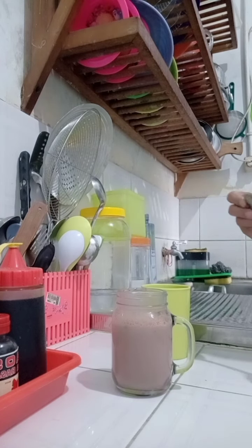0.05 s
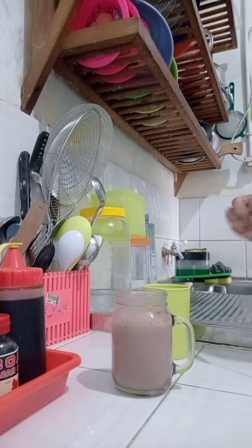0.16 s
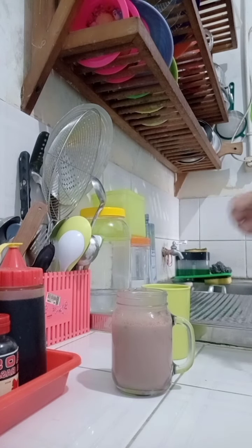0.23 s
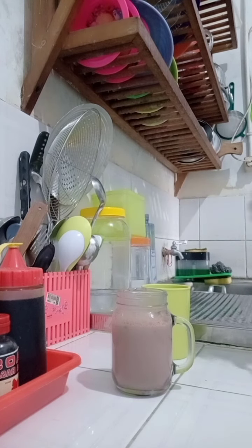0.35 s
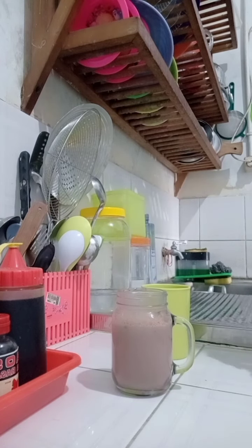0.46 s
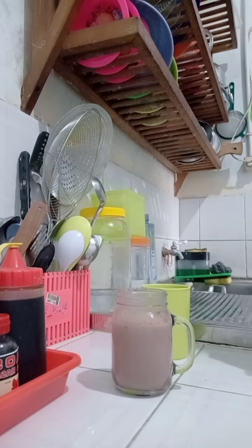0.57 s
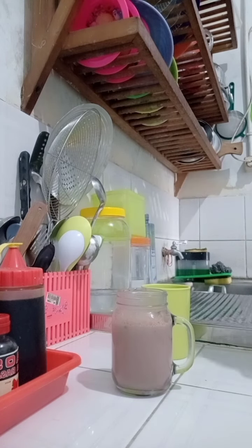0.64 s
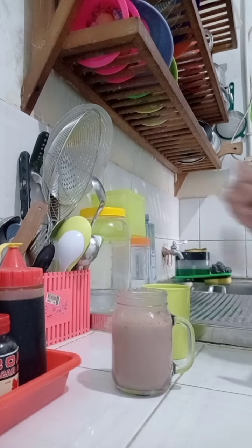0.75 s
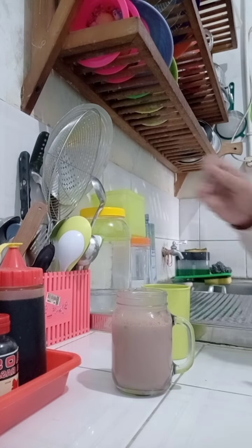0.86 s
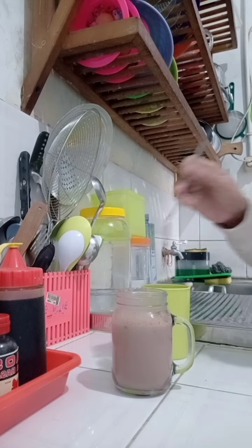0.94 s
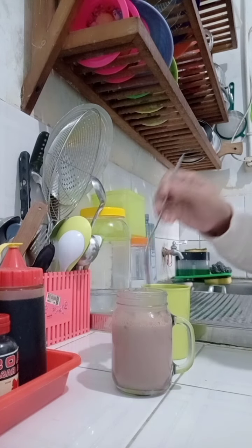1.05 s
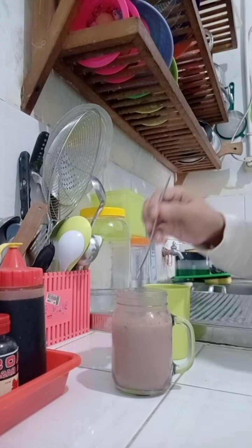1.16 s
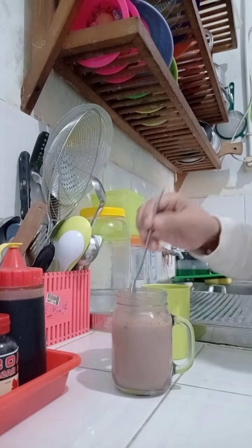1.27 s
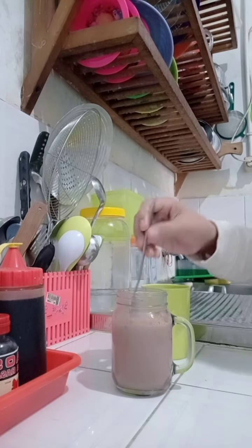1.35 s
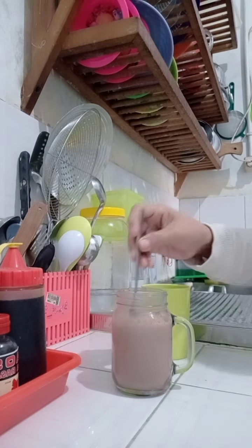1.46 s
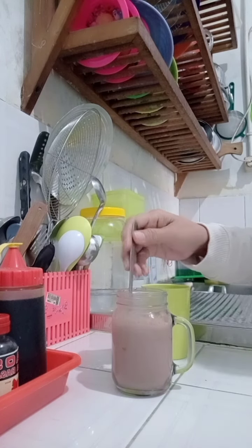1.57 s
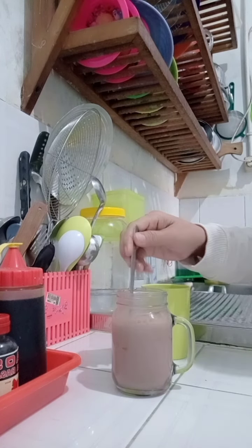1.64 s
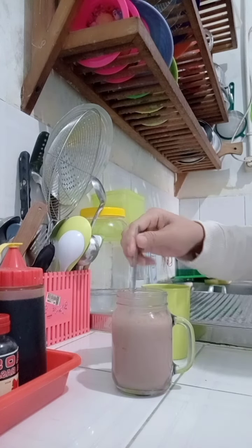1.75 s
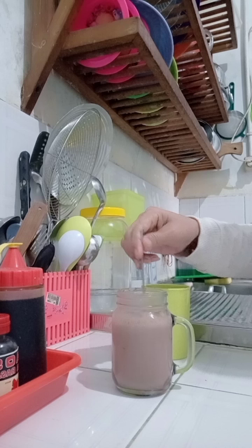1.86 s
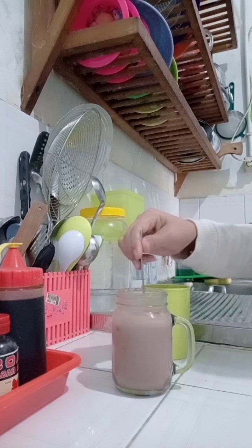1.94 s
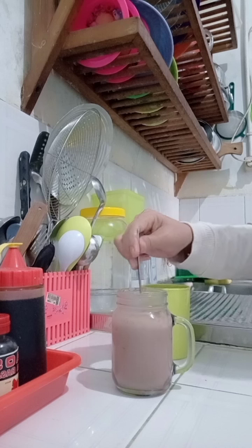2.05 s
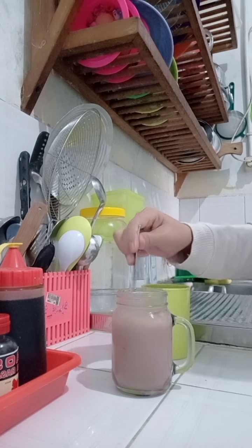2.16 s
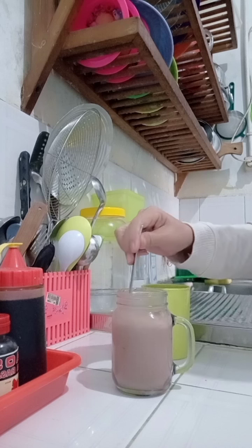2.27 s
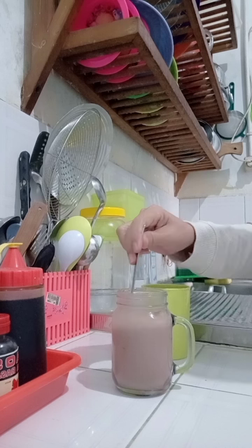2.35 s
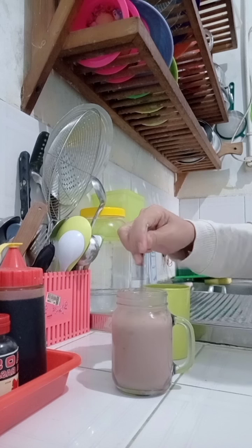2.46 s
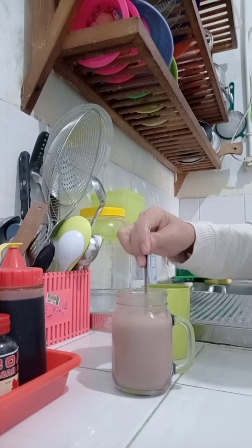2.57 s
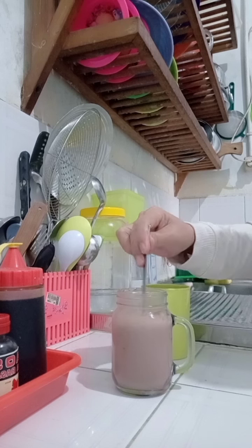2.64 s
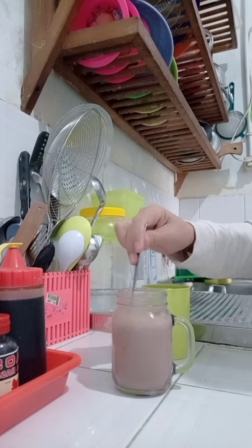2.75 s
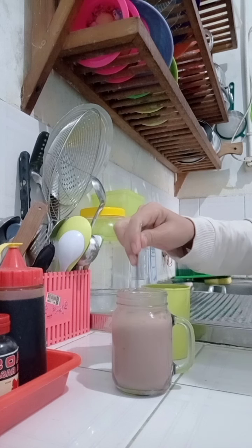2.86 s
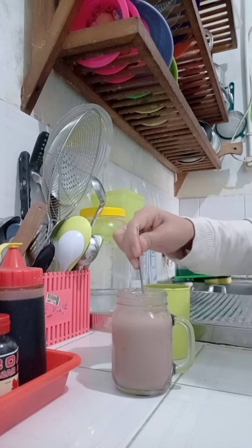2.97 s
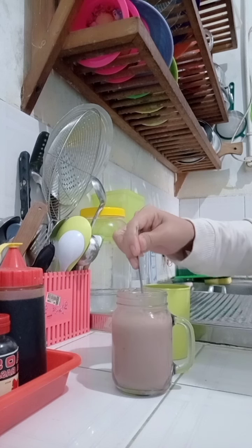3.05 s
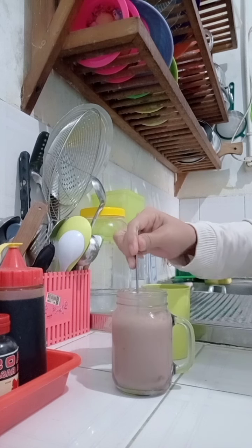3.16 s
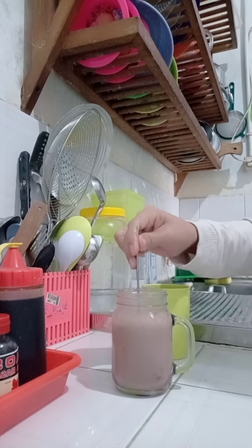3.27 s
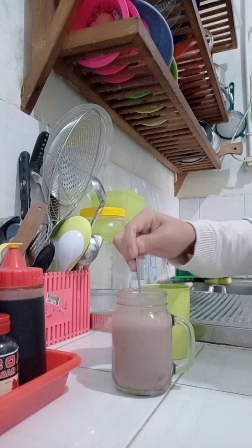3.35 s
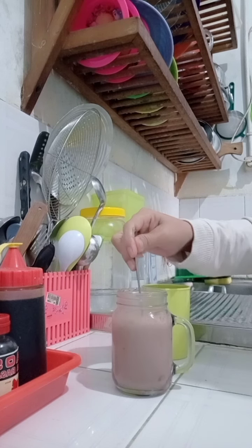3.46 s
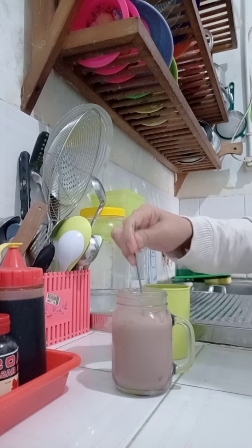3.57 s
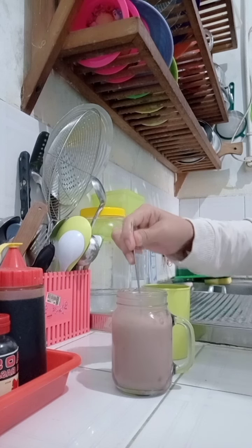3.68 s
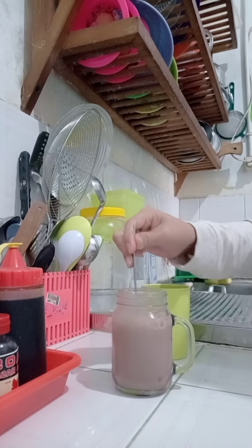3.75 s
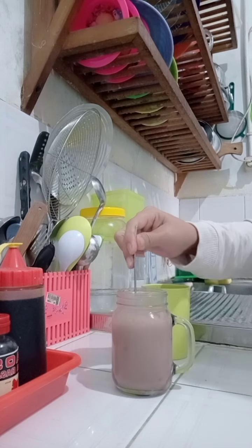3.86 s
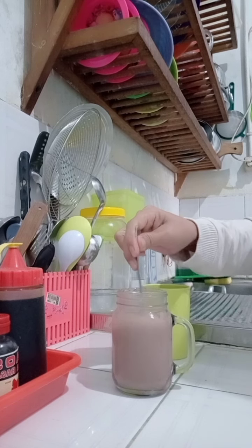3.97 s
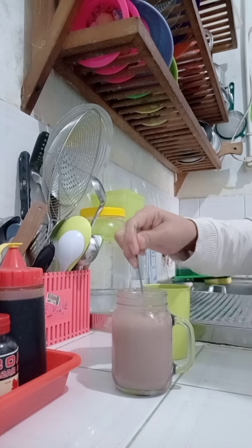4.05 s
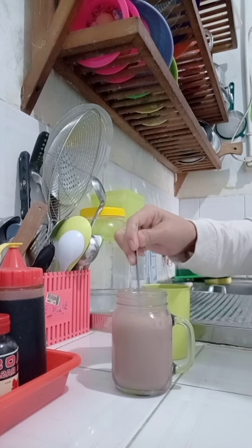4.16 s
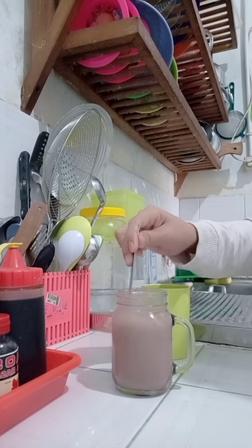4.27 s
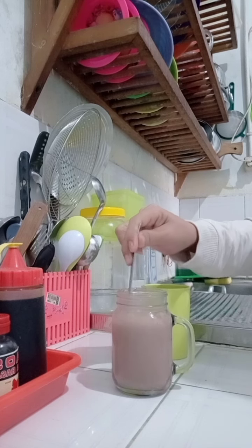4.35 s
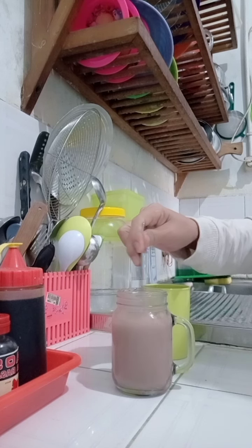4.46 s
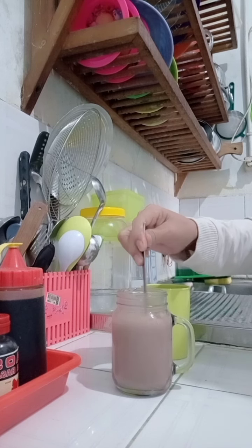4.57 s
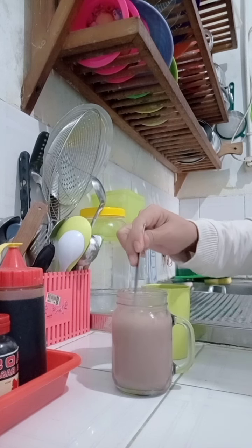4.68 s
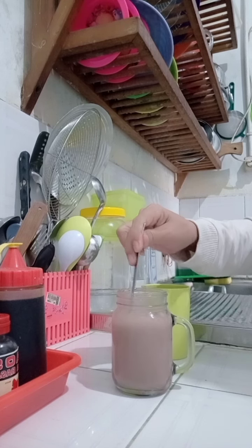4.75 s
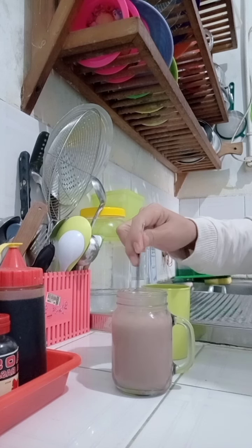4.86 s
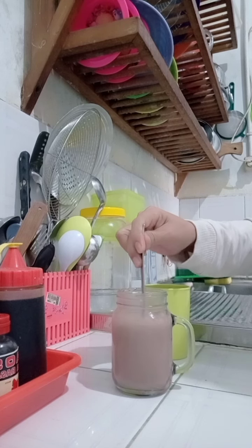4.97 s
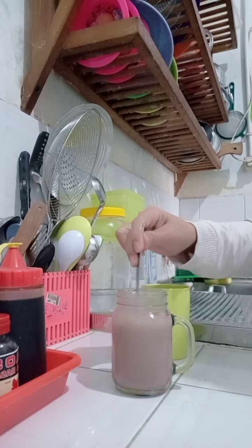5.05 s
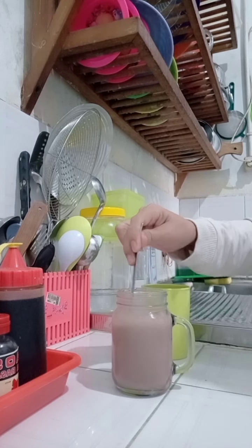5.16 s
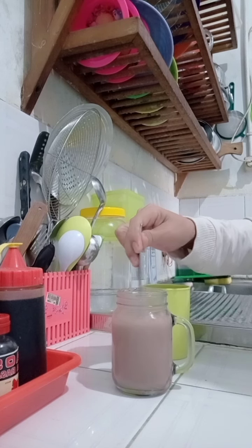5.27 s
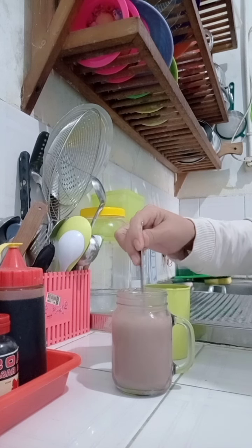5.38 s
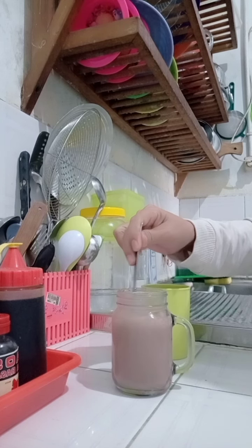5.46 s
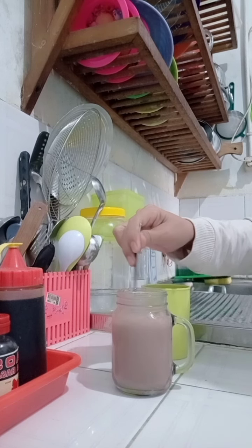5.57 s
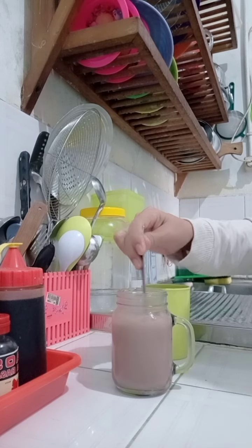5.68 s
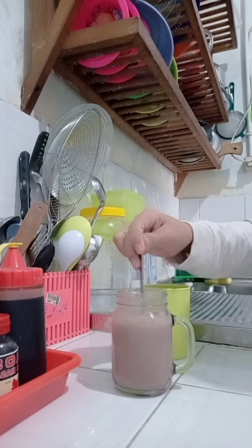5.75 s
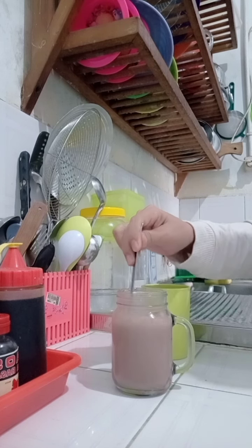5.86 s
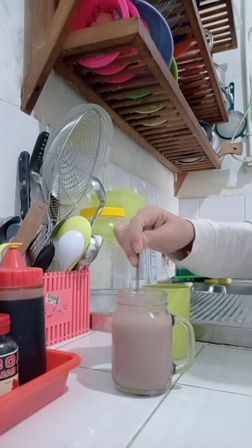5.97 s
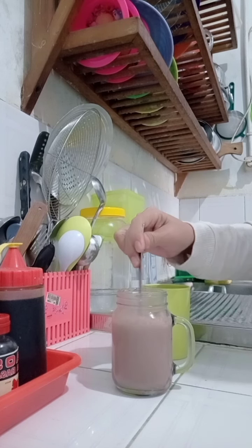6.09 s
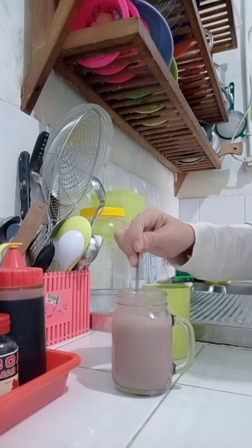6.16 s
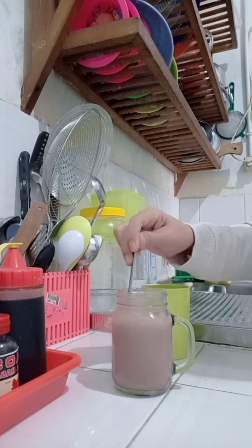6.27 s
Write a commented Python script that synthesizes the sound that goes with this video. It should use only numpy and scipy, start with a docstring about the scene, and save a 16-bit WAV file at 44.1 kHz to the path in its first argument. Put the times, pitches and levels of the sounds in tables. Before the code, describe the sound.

A metal spoon knocks irregularly against a full glass mug, dull choked clinks over quiet room hush in a small hard tiled kitchen.

```python
"""Stirring a frothy drink.

A metal spoon stirs a thick frothy drink in a glass mug on a tiled counter, near a phone with two inlets.
The froth damps the glass: each blow is a bundle of short swelling modes with a tick and a counter thump.
The first two taps let the spoon ring free; later ones carry a treble crack made of shaped noise instead.
Single echoes and noise-like tails make the hard kitchen; filtered hush and gliding whistles lie beneath.
"""
import sys
import numpy as np
from scipy import signal
from scipy.fft import rfft, irfft
from scipy.io import wavfile
from scipy.ndimage import uniform_filter1d

SR = 44100
rng = np.random.default_rng(int(sys.argv[2]) if len(sys.argv) > 2 else 0)


def unload_audio(sound):
    """Save the sound as a 16-bit wav file, at the path given as the first command line argument."""
    columns = np.transpose(np.atleast_2d(sound))
    # keep every value between -1 and 1, then stretch to whole-number steps
    steps = np.round(np.clip(columns, -1, 1) * 32767)
    wavfile.write(sys.argv[1], SR, steps.astype(np.int16))


N = 278712

# All levels are relative to the other parts of the same layer, before the room.
# spoon blows on the glass: start_s, strength_db, wall_hz, belly_over_wall_db, belly_hz, tick_over_wall_db
BLOWS = [(0.428, -70.5, 1390, 14.5, 842, -18), (1.2269, -35, 1720, 7.5, 1040, 9),
         (1.6307, -57, 1500, -13, 1130, -10), (1.6502, -56, 1820, -22, 955, -20),
         (1.7718, -30, 1360, 1, 780, -9.5), (1.978, -33, 1430, -6.5, 820, -2),
         (1.9912, -43, 1350, -3, 850, 2), (2.3699, -23.5, 1503, -5.5, 1010, -20),
         (2.391, -45, 1520, -27, 900, -1), (2.6068, -48, 1600, -10, 670, -24),
         (2.762, -25, 1237, -8.5, 1037, -10.5), (2.9512, -30, 1440, 1.5, 1227, -14),
         (3.0315, -45.5, 1450, -12, 1110, -22), (3.053, -51.5, 1650, -1, 740, -13),
         (3.061, -56, 1620, -1, 895, -8), (3.143, -53, 1380, -19, 1130, -29),
         (3.185, -73, 1500, -4, 900, -2), (3.2274, -23.5, 1425, -8, 940, -0.5),
         (3.4575, -41, 1645, -5, 1156, -32), (3.514, -54, 1840, 1, 1210, -32),
         (3.5367, -55, 1565, 2.5, 810, -30), (3.6089, -52, 1230, 5, 1150, -15),
         (3.6447, -33.5, 1330, -9, 980, 2.5), (3.6698, -59, 1140, 4, 1160, -15),
         (3.8694, -26.5, 1437, -13, 970, -4), (3.9972, -41, 1160, 4, 803, -47),
         (4.0829, -53.5, 1210, 3, 760, -25), (4.1158, -41.5, 1270, 6.5, 740, -34),
         (4.13, -40, 1310, 3, 780, -14), (4.144, -44.5, 1490, -1, 750, -14),
         (4.3762, -26.5, 1340, -9, 1240, -21), (4.39, -49, 1530, 8, 890, 2),
         (4.466, -28, 1404, -2, 1120, -12.5), (4.552, -47, 1660, -10, 840, -16),
         (4.6467, -22, 1410, -10, 787, -15.5), (4.717, -19.5, 1390, -9.5, 842, 1.5),
         (4.78, -27, 1360, -6.5, 980, -38), (4.932, -27, 1345, -8, 750, -21),
         (4.9544, -41.5, 1680, -2, 955, -12), (4.9722, -44, 1190, -17, 1100, -0.5),
         (5.1538, -29.5, 1370, -15.5, 732, -29), (5.2993, -27, 1370, -4, 732, -13.5),
         (5.3217, -32, 1145, -7, 1060, -11.5), (5.6199, -28.5, 1350, -13, 1090, -25),
         (5.6622, -32.5, 1396, 0, 798, -13), (5.683, -45.5, 1400, 11.5, 1110, -3.5),
         (5.8155, -32, 1400, -2, 800, -13), (5.8249, -35, 1770, -10, 860, -4),
         (5.8641, -34, 1326, -8, 770, -19), (5.9362, -34.5, 1253, -26, 1090, -16),
         (6.047, -26, 1327, -3.5, 761, -18.5), (6.2781, -36, 1340, -13.5, 1110, -26)]
# plips of the drink around the spoon: start_s, pitch_hz, level_db
PLIPS = [(.505, 865, -65), (2.334, 1340, -54), (2.341, 1520, -51), (2.355, 1510, -54), (2.631, 730, -60),
         (2.685, 1550, -57), (3.09, 258, -50)]
# modes of the spoon ringing free: pitch_hz, level_over_tick_db, t60_s
SPOON_MODES = [(2890, -42, .2), (3914, -17, .3), (8215, -35, .1), (11270, -37, .25), (13200, -52, .15),
               (14030, -52, .15), (15050, -44, .12)]
# resonances of the microphone inlet, excited by the tick: pitch_hz, level_db
INLET_MODES = [(4846, -0.5), (5267, -9.5), (4016, -5.5), (3300, -17), (6940, -26)]
# colour of the treble crack: freq_hz, level_db
CRACK_COLOUR = [(5000, -15.5), (6800, -22.5), (7600, -29.5), (8600, -22), (10000, -37), (11300, -24),
                (12200, -37), (13600, -16.5), (15000, -40), (16400, -43.5)]
# how readily the counter booms over the course of the stir: time_s, level_db
THUMP_LEVEL = [(1.2, -48), (3.5, -55.5), (4.2, -45.5), (6.3, -42)]
# near reflections off tiles and wall, as set for the left inlet: delay_s, share
COUNTER_ECHOES = [(.0011, 0.042), (.0021, 0.28), (.0055, .15)]
# right inlet compared with the left: freq_hz, level_db
RIGHT_SHADE = [(250, -10.5), (700, -3), (1300, -11), (2400, -14.5), (4400, -10.5), (8000, -8.5),
               (15000, -12)]
# decay of the kitchen tail: freq_hz, t60_s
KITCHEN_DECAY = [(250, 0.52), (600, 0.56), (1400, 0.53), (3700, 0.55), (9700, 0.41)]
# colour of the kitchen tail: freq_hz, level_db
KITCHEN_COLOUR = [(100, -40), (250, 0.5), (500, 4.5), (900, -0.5), (1300, -4.5), (1650, 8), (2100, 1),
                  (3000, 9.5), (3800, -3.5), (4800, -2), (6500, 3), (9000, -3.5), (13000, -2)]
# left-right likeness of the kitchen tail: freq_hz, likeness
KITCHEN_LIKENESS = [(200, 1), (600, 0.96), (1200, 0.022), (4000, 0.06)]
# tones that linger in the nook under the shelf: pitch_hz, level_db
NOOK_TONES = [(767, -8), (1204, -6), (1441, 0), (1545, -3), (1578, -2), (1600, 0), (1638, -1), (1696, -5),
              (1777, -4), (1831, -6), (1960, -6), (2040, -7), (2348, -9)]
# colour of the room hush: freq_hz, level_db
HUSH_COLOUR = [(20, -16), (35, -48), (70, -7.5), (105, -8), (165, -3.5), (260, -7), (500, -9), (900, -10),
               (1400, -15), (2300, -10.5), (3300, -20), (5000, -22.5), (8000, -33.5), (13500, -32.5),
               (16400, -38)]
# left-right likeness of the hush: freq_hz, likeness
HUSH_LIKENESS = [(60, 0.65), (240, 0.82), (950, 0.034), (3770, 0.035), (15000, -0.09)]
# level of the low swirl of the drink: time_s, level_db
SWIRL_LEVEL = [(0, -105), (1.5, -81.5), (3, -68.5), (4, -75), (4.998, -69), (5.6, -69), (6.252, -69.5),
               (6.32, -55)]
# colour of the swirl: freq_hz, level_db
SWIRL_COLOUR = [(60, -39.5), (100, 12), (250, -4.5), (400, 9.5), (900, -83.0)]
# faint far whistles: start_s, length_s, first_hz, last_hz, level_db
WHISTLES = [(.63, .12, 2800, 2800, -68), (5.7, .13, 2850, 3000, -60), (5.86, .2, 3600, 3400, -62),
            (6.09, .2, 3750, 3900, -64), (6.21, .16, 2950, 2850, -58)]

HUSH_DB = -63.5
DIPPED_S = 1.4  # from here on the drink grips the spoon
CROSSFADES_PER_S = 1.3  # pace at which the kitchen tails crossfade, in half turns
NEAR_DB = 9.5  # lift of the direct sound and its near echoes against the kitchen tail
RIGHT_LAG = 8  # samples further to the right inlet
NOOK_DB, NOOK_T60 = -15, .4  # level in dB against the tail, decay in s
SHOULDER_RATIO, SHOULDER_DB = 1.445, -3  # pitch ratio and dB to the wall
BASE_HZ, BASE_DB = 606, -19.5  # heavy foot of the mug on the tile, dB to the belly before the push
PUSH_FULL_DB = -11.5  # blows with a softer tick than this push no further
CRACK_DB, CRACK_SHARE = -9, .45  # dB to the wall, and dB gained per dB of hardness
THUMP_HZ, THUMP_T60, THUMP_SHARE = 252, 0.092, 0.56  # pitch, decay in s, dB per dB of belly
EDGE_HZ = 16400  # upper band limit
OFFSET = .0011  # constant bias of the converter, share of full scale


def amp(db):
    """Turn decibels into an amplitude factor."""
    return 10 ** (np.asarray(db) / 20)


def evened(x):
    """Scale to an RMS of one."""
    return x / np.sqrt(np.mean(x ** 2) + 1e-20)


def peaked(x):
    """Scale to a peak of one."""
    return x / abs(x).max()


def read(points, hz):
    """Read a curve between its points on a logarithmic frequency axis."""
    f, value = np.transpose(points)
    return np.interp(np.log(hz + 1), np.log(f + 1), value)


def add(mix, s, sound):
    """Lay a sound into the mix at s seconds, cut off at the end."""
    part = mix[..., round(s * SR):][..., :sound.shape[-1]]
    part += sound[..., :part.shape[-1]]


def coloured(spectrum, count):
    """Noise shaped by a spectrum, at an RMS of one."""
    gain = amp(read(spectrum, np.fft.rfftfreq(count, 1 / SR)))
    return evened(irfft(rfft(rng.standard_normal(count)) * gain, count))


def ring(t, hz, t60, rise, phase):
    """A mode that swells for a moment, then dies exponentially."""
    envelope = peaked((1 - np.exp(-t / rise)) ** 2 * amp(-60 * t / t60))
    return envelope * np.sin(2 * np.pi * (hz * t + phase))


def press(t, hz, peak, spread, phase):
    """A mode that swells while the spoon presses and is choked by the froth."""
    envelope = peaked(t / (t + 0.00037) * np.exp(-((t - peak) / spread) ** 2))
    return envelope * np.sin(2 * np.pi * (hz * t + phase))


def hush():
    """Room noise whose level wanders softly, alike left and right in the bass, with a low swirl on top."""
    frames, hz = N // 256 + 5, np.fft.rfftfreq(1024, 1 / SR)
    a, b, c, d, patches = rng.standard_normal((frames, 513, 5)).T
    patches = evened(uniform_filter1d(uniform_filter1d(patches, 12, 0), 14, 1))
    same = np.clip(read(HUSH_LIKENESS, hz), -1, 1)[:, None]
    left, other = a + 1j * b, c + 1j * d
    z = np.array([left, same * left + np.sqrt(1 - same ** 2) * other])
    z *= amp(read(HUSH_COLOUR, hz)[:, None] + 1.6 * patches)
    noise = signal.istft(z, nperseg=1024, noverlap=768)[1][:, :N]
    noise *= amp(HUSH_DB) / noise.mean(0).std()
    swirl_db = np.interp(np.arange(N) / SR, *np.transpose(SWIRL_LEVEL))
    swirl = amp(swirl_db) * coloured(SWIRL_COLOUR, count=N)
    return (noise + swirl) * amp([[1.1], [-1.1]])  # leans left


def whistles():
    """Gliding tones made fuzzy by slow random amplitudes, as if smeared by distance."""
    out = np.zeros((2, N))
    for s, length, first_hz, last_hz, db in WHISTLES:
        hz = np.linspace(first_hz, last_hz, round(length * SR))
        a, b = uniform_filter1d(rng.standard_normal((2, 2, SR // 2)), 170)[..., :len(hz)]
        turn = 2 * np.pi * np.cumsum(hz) / SR
        tone = evened(a * np.cos(turn) + b * np.sin(turn))
        add(out, s, amp(db) * tone * signal.windows.tukey(len(hz), .6))
    return out


def echoes():
    """Dense taps of random sign, each band dying at its own speed, and a few tones that linger."""
    taps = np.zeros((2, SR))
    slots = np.arange(220, SR - 10, 10)
    at = slots + rng.integers(0, 10, (2, len(slots)))
    np.put_along_axis(taps, at, rng.choice([-1., 1.], at.shape), 1)
    hz, frame_s, z = signal.stft(taps, SR, nperseg=256)
    same = np.clip(read(KITCHEN_LIKENESS, hz), -1, 1)[:, None]
    z[1] = same * z[0] + np.sqrt(1 - same ** 2) * z[1]
    decay = amp(-60 * frame_s / read(KITCHEN_DECAY, hz)[:, None])
    tail = signal.istft(z * decay, SR, nperseg=256)[1]
    tail = tail[:, :SR] / np.linalg.norm(tail[0])
    tail = irfft(rfft(tail) * amp(read(KITCHEN_COLOUR, np.fft.rfftfreq(SR, 1 / SR))), SR)
    t = np.arange(SR) / SR
    tones = sum(amp(db) * ring(t, f, NOOK_T60, 0.0039, rng.random((2, 1))) for f, db in NOOK_TONES)
    return tail + amp(NOOK_DB) * tones / np.linalg.norm(tones[0])


def kitchen(source):
    """The kitchen's echoes: three random tails of like decay and colour, crossfaded at constant power."""
    half_turns = np.arange(N) / SR * CROSSFADES_PER_S
    # the squares of the three shares always add up to one
    shares = [np.cos(np.pi * (half_turns + k / 3)) * np.sqrt(2 / 3) for k in range(3)]
    wet = sum(signal.fftconvolve((share * source)[None], echoes(), axes=1) for share in shares)
    return wet[:, :N] * amp([[2.5], [-2.5]])  # leans left


def counter(direct):
    """Tiles and wall send single echoes; the right inlet hears all a little later and shaded."""
    out = direct.copy()
    for s, share in COUNTER_ECHOES:
        add(out[0], s, share * direct[0])
        add(out[1], s * 1.15, share * 1.2 * direct[1])
    hz = np.fft.rfftfreq(N, 1 / SR)
    lag = np.exp(-2j * np.pi * hz * RIGHT_LAG / SR)
    out[1] = irfft(rfft(out[1]) * amp(read(RIGHT_SHADE, hz)) * lag, N)
    return out


def blow(s, strength_db, wall_hz, belly_over_db, belly_hz, hard_db):
    """Choked glass modes, a tick through the inlet, the counter, and a free spoon or a treble crack."""
    t = np.arange(SR // 2) / SR
    phase = rng.normal(0, 1 / 20, 16)  # in turns: struck modes start near rest
    belly_db, tick_db = strength_db + belly_over_db, strength_db + hard_db
    push_db = -max(hard_db, PUSH_FULL_DB)  # a softer, longer contact pushes the mug into the tile

    wall = amp(strength_db) * press(t, wall_hz, .0019, .0018, phase[0])
    belly = amp(belly_db) * press(t, belly_hz, 0.0024, 0.0015, phase[1])
    shoulder = press(t, SHOULDER_RATIO * wall_hz, 0.00033, 0.0011, phase[2])
    shoulder *= amp(strength_db + SHOULDER_DB)
    base = amp(belly_db + BASE_DB + push_db) * ring(t, BASE_HZ, 0.013, 0.0004, phase[3])

    inlet = sum(amp(db) * press(t, f, .0009, .0015, p) for (f, db), p in zip(INLET_MODES, phase[4:]))
    tick = amp(tick_db) * inlet
    burst = amp(tick_db - 8) * rng.standard_normal(len(t)) * amp(-60 * t / .003)
    click = signal.lfilter([.3, -.3], [1, -.6], burst)  # a small contact loses the bass

    # the counter answers the belly, less than in proportion
    thump_db = THUMP_SHARE * belly_db + push_db + np.interp(s, *np.transpose(THUMP_LEVEL))
    thump = amp(thump_db) * ring(t, THUMP_HZ, THUMP_T60, 0.0072, 0)

    if s < DIPPED_S:
        treble = sum(amp(tick_db + db) * ring(t, f, t60, 0.00048, p)
                     for (f, db, t60), p in zip(SPOON_MODES, phase[9:]))
    else:
        crack_db = strength_db + CRACK_DB + CRACK_SHARE * hard_db
        envelope = ring(t, 0, .006, .0004, 1 / 4)  # 0 Hz at a quarter turn: the bare envelope
        treble = amp(crack_db) * coloured(CRACK_COLOUR, count=len(t)) * envelope
    return wall + belly + shoulder + base + tick + click + thump + treble


def stirring():
    """Place all blows and the short choked plips; return the source and its lifted direct pair."""
    source = np.zeros(N)
    t = np.arange(800) / SR
    for row in BLOWS:
        add(source, row[0], blow(*row))
    for s, hz, db in PLIPS:
        add(source, s, amp(db) * press(t, hz, 0.0012, 0.003, 0))
    return source, amp(NEAR_DB) * np.array([source, source])


def scene():
    """Sum the knocks in their room with the hush and the whistles."""
    source, direct = stirring()
    knocks = counter(direct) + kitchen(source)
    small = signal.butter(2, 130, "high", fs=SR, output="sos")  # a mug radiates no deep bass
    return signal.sosfilt(small, knocks) + hush() + whistles()


def record(dry):
    """Cut the top with a steep low-pass and add the converter's constant bias."""
    band = signal.firwin(511, EDGE_HZ, window=("kaiser", 9), fs=SR)
    return signal.oaconvolve(dry, band[None], "same") + OFFSET


dry = scene()
out = record(dry)
unload_audio(out)
```